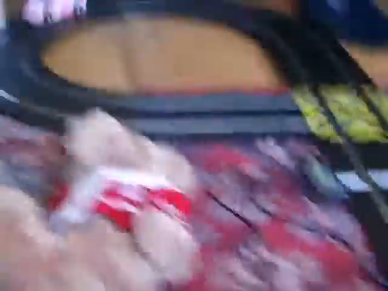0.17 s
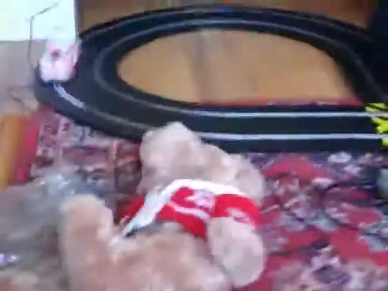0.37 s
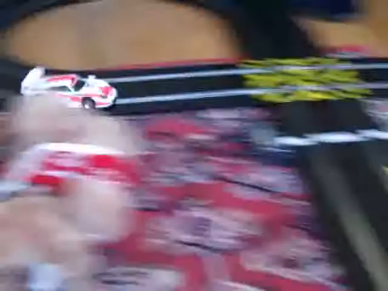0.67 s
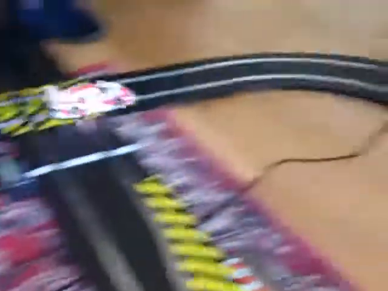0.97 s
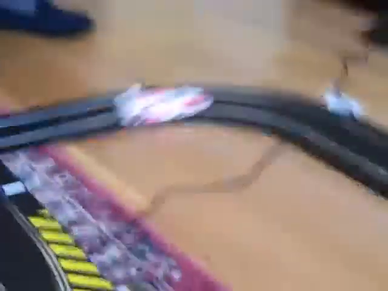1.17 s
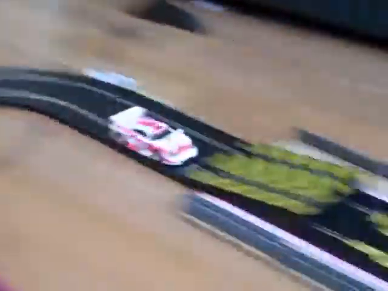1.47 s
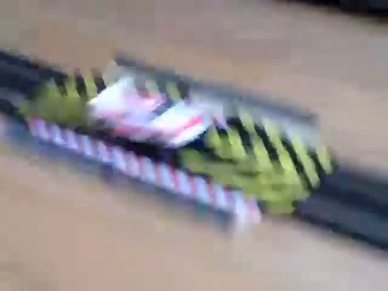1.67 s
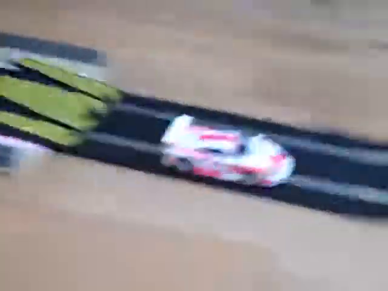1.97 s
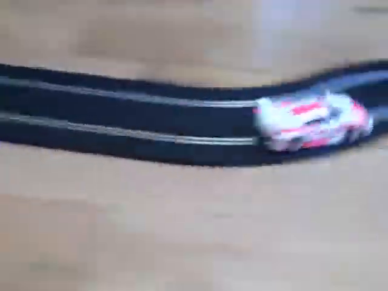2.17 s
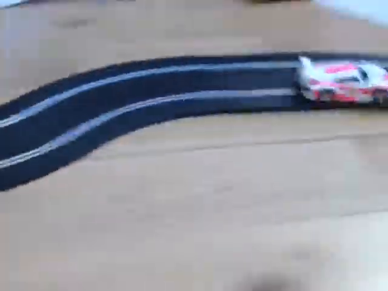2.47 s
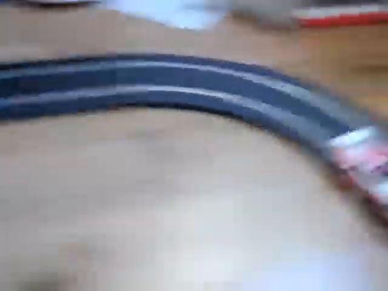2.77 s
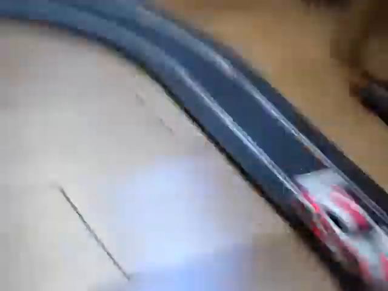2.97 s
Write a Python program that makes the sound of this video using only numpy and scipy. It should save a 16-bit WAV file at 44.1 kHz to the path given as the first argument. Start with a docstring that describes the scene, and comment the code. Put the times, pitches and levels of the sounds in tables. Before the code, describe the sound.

Continuous rough whirr of a small slot car indoors, early ticks, harder clacks around one second and just before two, then a brighter whine fading into plain rushing hiss; close, cheap microphone with muffled treble.

```python
"""Toy slot car on a plastic track

A toy slot car runs on a plastic track on a wooden floor, heard from close by.
Uneven sine tones make the gear whine, and shaped noise makes the rolling, the rail hiss and the low rumble.
Short gliding tones hum like the motor, and brief bursts of noise clatter at the joints.
Little is left above 6 kHz, where a narrow band switches on and off; weak bits of the spectrum
drop out, and a faint fizz follows the level.
"""
import sys
import numpy as np
from scipy import signal
from scipy.fft import rfft, irfft, next_fast_len
from scipy.io import wavfile
from scipy.ndimage import uniform_filter1d, map_coordinates

SR = 44100
rng = np.random.default_rng(int(sys.argv[2]) if len(sys.argv) > 2 else 0)


def boost_factor(decibels):
    """Convert a level in decibels to a linear amplitude factor."""
    exponent = np.asarray(decibels, float) / 20
    return 10 ** exponent


def bounce(signal):
    """Save signal as a 16-bit WAV file at the path given by the first command-line argument."""
    frames = np.transpose(np.atleast_2d(signal))
    limited = np.clip(frames, -1, 1)
    pcm = np.round(limited * 32767).astype(np.int16)
    wavfile.write(sys.argv[1], SR, pcm)


N = 137151  # length in samples

# Levels in the tables are relative: the functions add a fixed trim or random lumps to most of them.
# How the car sounds over time. Each row: time in seconds, pitch of the meshing gear teeth in Hz,
# whine level in dB, rolling noise level in dB, rail hiss level in dB.
CAR_OVER_TIME = [(0.0, 974, -29, -31, -27.5), (0.04, 1000, -26, -27.5, -26), (0.09, 984, -31, -30.5, -25.5),
                 (0.19, 906, -30.5, -29.5, -28.5), (0.28, 943, -32, -28, -26.5), (0.33, 966, -49, -31, -28),
                 (0.47, 1030, -30, -27.5, -26.5), (0.59, 921, -42, -29, -26.5),
                 (0.84, 910, -27.5, -32.5, -28.5), (0.88, 920, -48, -32.5, -33),
                 (0.93, 876, -28.5, -29.5, -28), (1.15, 922, -31, -30.5, -27),
                 (1.19, 973, -26.5, -29, -28.5), (1.22, 990, -32, -30, -27), (1.32, 1028, -23, -28, -26),
                 (1.5, 927, -29, -31, -32), (1.58, 992.4, -26, -31, -27.5), (1.62, 900, -44, -28, -26),
                 (1.66, 830.7, -24.5, -28, -26), (1.72, 920, -21, -27.5, -27.5),
                 (1.79, 1010, -30.5, -29.5, -29.5), (1.85, 989, -22, -26.5, -22),
                 (1.93, 985, -37, -28, -29.5), (2.08, 923.5, -26, -29.5, -30),
                 (2.16, 1020, -32, -28.5, -26.5), (2.21, 998, -22.5, -22, -26.5),
                 (2.3, 989, -22.5, -27, -23), (2.36, 980, -28.5, -27.5, -28), (2.59, 900, -28.5, -31, -27),
                 (2.62, 909, -20.5, -25, -24.5), (2.67, 908, -43, -29.5, -26), (2.81, 927, -57, -28, -27.5),
                 (2.9, 901, -57, -31, -28.5), (2.99, 915, -47, -31, -28.5), (3.11, 967, -60, -26, -26.5)]
# The low sound of the track over time. Each row: time in seconds, rumble level in dB,
# drone level in dB, low middle level in dB.
TRACK_OVER_TIME = [(0.0, -51, -39, -44), (0.02, -43, -37, -39), (0.11, -43, -42.5, -44),
                   (0.16, -46.5, -43, -40), (0.28, -45, -36.5, -40), (0.37, -45.5, -45.5, -46),
                   (0.42, -36, -40, -37.5), (0.49, -46.5, -31.5, -36.5), (0.75, -43.5, -41, -40),
                   (0.93, -55, -41, -37), (1.02, -41, -35.5, -34), (1.13, -41, -44.5, -38),
                   (1.21, -45, -40, -47.5), (1.26, -58, -47.5, -46.5), (1.9, -54.5, -47, -38),
                   (1.96, -44, -39, -46), (2.0, -68, -39, -47), (2.1, -42.5, -39.5, -39.5),
                   (2.17, -43, -40.5, -42), (2.25, -58, -42, -39), (2.3, -37.5, -40, -36.5),
                   (2.36, -47, -45, -47.5), (2.53, -45, -42, -42), (2.55, -42, -73, -39),
                   (2.6, -40, -30, -43), (2.63, -42.5, -53, -55), (2.72, -43.5, -44.5, -41),
                   (2.83, -40, -41, -46.5), (3.02, -47, -40.5, -43.5), (3.11, -31, -36.5, -42.5)]
# Spells of motor hum. Each row: start in seconds, length in seconds, first pitch in Hz,
# last pitch in Hz, level in dB.
HUM_SPELLS = [(0.478, 0.12, 370, 284, -44), (0.834, 0.196, 239.2, 274.4, -37),
              (1.235, 0.37, 374.4, 370.8, -43), (1.636, 0.307, 320, 348.4, -42),
              (2.098, 0.095, 168.6, 147.6, -41), (2.2, 0.073, 335, 410.1, -35.5),
              (2.585, 0.17, 399.5, 358.3, -43), (2.775, 0.16, 276.6, 282.6, -33)]
# Clatter over joints. Each row: start in seconds, peak level in dB, length held in seconds,
# level of the dull part over the bright part in dB.
JOINT_HITS = [(0.031, -21, 0.029, -0.5), (0.143, -15, 0.0064, -9), (0.243, -16, 0.021, -7.5),
              (0.33, -28.5, 0.0071, -11), (0.977, -12, 0.011, -22.5), (1.024, -11, 0.028, -12),
              (1.6, -10, .018, -10.5), (1.614, -16, 0.046, -15), (.446, -17, .004, -8),
              (.458, -12, .006, -2), (.467, -9, .011, -8), (1.8268, -2, .001, -6), (1.9755, -7, .004, -12),
              (1.981, -5, .013, -9), (1.846, -21.5, 0.051, 4.5), (1.887, -14.5, 0.012, -13),
              (2.213, -19, .003, 4), (2.228, -15.5, 0.0041, 2.5), (2.252, -19, 0.0025, -1.5),
              (2.265, -19.5, 0.0034, 8), (2.37, -14.5, 0.0042, -7), (2.33, -17.5, 0.01, 2)]
# Overtones of the gear whine. Each row: multiple of the mesh pitch, level in dB.
WHINE_OVERTONES = [(1, -1.5), (2, -8.5), (3, -22)]

# Noise colours, loudness set elsewhere. Each row: frequency in Hz, strength in dB per Hz.
ROLL_SPECTRUM = [(460, -38), (780, -5), (900, -3.5), (1000, -2), (1270, -4.5), (1820, -1.5), (2330, -3.5),
                 (2750, -2.5), (4000, -7), (5200, -28), (8800, -120)]
HISS_SPECTRUM = [(2120, -15.5), (3600, -2), (4020, -0.5), (4620, 3.5), (5770, 0), (6000, 3.5),
                 (7800, -31.5), (13200, -120)]
BRIGHT_RATTLE_SPECTRUM = [(1500, -33), (2300, -8.5), (2800, 0), (3500, -2), (4000, -7.5), (4600, 1),
                          (6500, 3), (9000, 5)]
DULL_RATTLE_SPECTRUM = [(250, -32), (500, -15), (900, -9.5), (1900, -4), (2500, -11.5), (3000, -36)]
RUMBLE_SPECTRUM = [(15, -42.5), (25, -15.5), (59, -1), (87, -2), (124, 2), (200, -3.5), (260, -44.5),
                   (440, -120)]
DRONE_SPECTRUM = [(190, -21.5), (210, -2), (430, -1.5), (460, -23)]
MIDDLE_SPECTRUM = [(420, -34), (450, 1.5), (600, 3.5), (780, 4.5), (820, -23)]
FIZZ_SPECTRUM = [(30, -2.5), (600, -13), (3000, -1), (6500, -3.5), (7600, -3), (8200, -12), (8600, -21.5),
                 (8950, -31)]

# How far under its whole frame a spectral cell counts as weak. Each row: frequency in Hz, limit in dB.
WEAK_UNDER_FRAME = [(400, -34), (480, -31.5), (1200, -29), (2200, -26.3), (4200, -26), (4600, -29.5)]

CUT_HZ, BAND_END_HZ = 6020, 6400  # a sharp treble cut; a band from there up to the second switches on and off


def unit(x):
    """Scale to rms 1."""
    return x / np.sqrt(np.mean(x ** 2) + 1e-20)


def curves(rows):
    """One value per sample for each column after the time, in straight lines between rows."""
    seconds, *columns = np.transpose(rows)
    t = np.arange(N) / SR
    return [np.interp(t, seconds, column) for column in columns]


def wobble(rate_hz):
    """A smooth random curve through rate_hz random points a second."""
    points = rng.standard_normal(N // 100)
    return map_coordinates(points, [np.arange(N) * rate_hz / SR])


def filtered(x, response):
    """Multiply the spectrum of x by a response that depends on frequency."""
    size = next_fast_len(N + 8192)
    hz = np.fft.rfftfreq(size, 1 / SR)
    return irfft(rfft(x, size) * response(hz), size)[:N]


def rush(spectrum, patchy_db=0., grain_db=0.):
    """Coloured noise of rms 1, with patches of random gain and a grainy loudness."""
    grainy = rng.standard_normal(N) * boost_factor(grain_db * wobble(400))
    cells = signal.stft(grainy, nperseg=1024)[2]
    # random gains, smoothed over 5 frequencies and 3 moments
    patches = uniform_filter1d(rng.standard_normal(cells.shape), size=5, axis=0)
    patches = unit(uniform_filter1d(patches, size=3, axis=1))
    noise = signal.istft(cells * boost_factor(patchy_db * patches), nperseg=1024)[1][:N]
    f, db = np.transpose(spectrum)

    def colour(hz):
        return boost_factor(np.interp(np.log(hz + 1), np.log(f + 1), db, -120, -120))

    return unit(filtered(noise, colour))


def track():
    """The track pieces on the floor give three low bands of noise with lumpy levels."""
    rumble_db, drone_db, middle_db = curves(TRACK_OVER_TIME)
    rumble = boost_factor(rumble_db + 2.9 * wobble(15)) * rush(RUMBLE_SPECTRUM, patchy_db=2)
    drone = boost_factor(drone_db - 1.5 + 1.0 * wobble(12)) * rush(DRONE_SPECTRUM, patchy_db=1)
    middle = boost_factor(middle_db + 2.44 * wobble(15)) * rush(MIDDLE_SPECTRUM, patchy_db=1)
    return rumble + drone + middle


def motor_hum():
    """Each spell is a sine that glides between two pitches, wavers, and swells and fades."""
    t, out = np.arange(N) / SR, np.zeros(N)
    waver = 0.018 * wobble(29.97)  # as a share of the pitch
    for start, length, first_hz, last_hz, db in HUM_SPELLS:
        progress = np.clip((t - start) / length, 0, 1)
        pitch_hz = (first_hz + (last_hz - first_hz) * progress) * (1 + waver)
        swell = np.sqrt(np.sin(np.pi * progress).clip(0))
        out += boost_factor(db + 1.5) * swell * np.sin(2 * np.pi * np.cumsum(pitch_hz) / SR)
    return out


def joints():
    """Each joint shakes the car: a bright rattle and a dull one, held briefly, then dying away."""
    rise_s, tail_s, trim_db = 0.001, 0.005, -8
    t, bright, dull = np.arange(N) / SR, np.zeros(N), np.zeros(N)
    for start, db, length, dull_db in JOINT_HITS:
        rise = np.clip((t - start) / rise_s + 0.5, 0, 1)
        fall = np.exp(-np.clip(t - start - length, 0, None) / tail_s)
        bright += boost_factor(db + trim_db) * rise * fall
        dull += boost_factor(db + trim_db + dull_db) * rise * fall
    rattle = bright * rush(BRIGHT_RATTLE_SPECTRUM, patchy_db=1, grain_db=2)
    rattle = rattle + dull * rush(DULL_RATTLE_SPECTRUM, patchy_db=0.5, grain_db=7.5)
    return filtered(rattle, lambda hz: hz < CUT_HZ)


def rolling_noise(roll_db):
    """Rolling makes a mostly mid-range noise, slightly patchy and grainy."""
    return boost_factor(roll_db + 2.0) * rush(ROLL_SPECTRUM, patchy_db=1, grain_db=0.5)


def rail_hiss_gain(hiss_db, turn):
    """The loudness of the rail hiss swells once a shaft turn."""
    pinion_teeth, swell_depth = 9, 0.15  # one shaft turn is this many tooth meshes
    swell = 1 + swell_depth * np.sin(2 * np.pi * turn / pinion_teeth + 1.5 * wobble(23))
    return boost_factor(hiss_db + 1.0) * swell


def rail_hiss(gain):
    """Braids and tyres hiss on the rails: bright noise, patchy and grainy."""
    return gain * rush(HISS_SPECTRUM, patchy_db=2, grain_db=0.6)


def switching_band(gain):
    """A narrow band of noise just above the treble cut switches on and off, following the hiss level."""
    is_on = wobble(36) > 0.15
    band = gain * boost_factor(-12.5) * is_on * rush([(CUT_HZ, 0), (BAND_END_HZ, 0)])
    return filtered(band, lambda hz: (hz > CUT_HZ) & (hz < BAND_END_HZ))


def gear_whine(mesh_hz, whine_db, turn):
    """Meshing teeth sing at the mesh pitch and its multiples, each uneven in pitch and level."""
    wander, uneven_hz, lump_db = 0.03, 140, 3.5  # share of pitch, random points a second, dB
    whine = np.zeros(N)
    for multiple, db in WHINE_OVERTONES:
        level = boost_factor(db + lump_db * wobble(uneven_hz))
        drift = np.cumsum(mesh_hz * wander * wobble(uneven_hz)) / SR
        whine += level * np.sin(2 * np.pi * multiple * (turn + drift))
    return boost_factor(whine_db - 6.0) * unit(whine)


def car():
    """Gear whine, rolling noise and rail hiss; the two noises share one random sway in level."""
    mesh_hz, whine_db, roll_db, hiss_db = curves(CAR_OVER_TIME)
    turn = np.cumsum(mesh_hz) / SR  # tooth meshes so far
    sway_db = 0.6 * wobble(9) + 0.9 * wobble(25)
    hiss_gain = rail_hiss_gain(hiss_db + sway_db, turn)
    body = rolling_noise(roll_db + sway_db) + rail_hiss(hiss_gain) + gear_whine(mesh_hz, whine_db, turn)
    return filtered(body, lambda hz: hz < CUT_HZ) + switching_band(hiss_gain)


def scene():
    """All layers added up, mono."""
    return (track() + motor_hum() + joints() + car())[None]


def thinned(x):
    """Spectral cells that are weak against their frame or their neighbours drop by up to 26 dB."""
    frame = dict(nperseg=1536, noverlap=768, window="cosine")
    hz, _, cells = signal.stft(x, SR, **frame)
    power = uniform_filter1d(abs(cells) ** 2, size=3, axis=0)
    power = uniform_filter1d(power, size=2, axis=1)
    under_db = np.interp(hz, *np.transpose(WEAK_UNDER_FRAME))[:, None]
    frame_limit = power.sum(0) * boost_factor(2 * under_db)
    neighbour_limit = uniform_filter1d(power, size=21, axis=0) * boost_factor(2 * -6.3)
    limit = frame_limit + neighbour_limit
    keep = 1 / (1 + (limit / (abs(power) + 1e-20)) ** 8)  # near 1 for strong cells, near 0 for weak
    gain = keep + (1 - keep) * boost_factor(-26)
    return signal.istft(cells * gain, SR, **frame)[1][:N]


def fizz(x):
    """A faint, wide, grainy noise that follows the level of x."""
    level = np.sqrt(abs(uniform_filter1d(x ** 2, size=900)))
    return level * boost_factor(-22 + 2.8 * wobble(9)) * rush(FIZZ_SPECTRUM, grain_db=4)


def band_limit(x):
    """A steep low-pass at the top of the band."""
    return signal.sosfilt(signal.butter(12, 8830, fs=SR, output="sos"), x)


def record(dry):
    """Thin out the weak cells, then add the faint fizz."""
    x = thinned(dry[0])
    mix = x + fizz(x)
    return band_limit(mix[None])


dry = scene()
out = record(dry)
bounce(out)
```